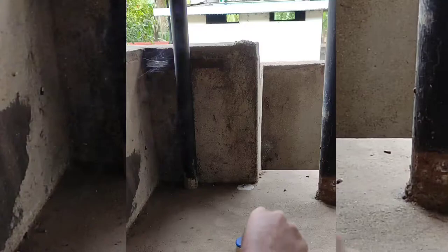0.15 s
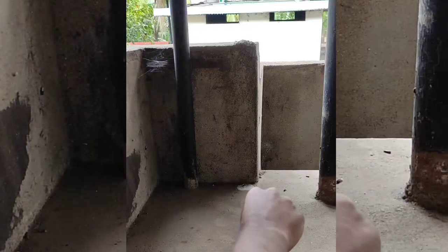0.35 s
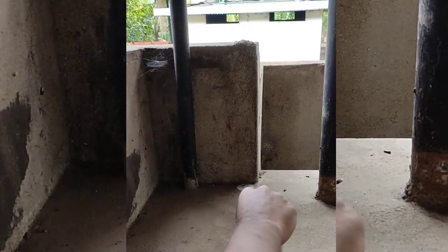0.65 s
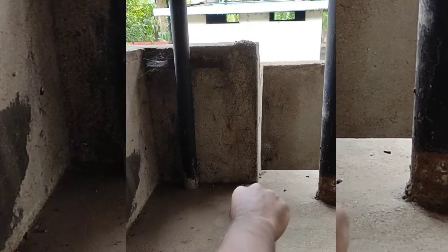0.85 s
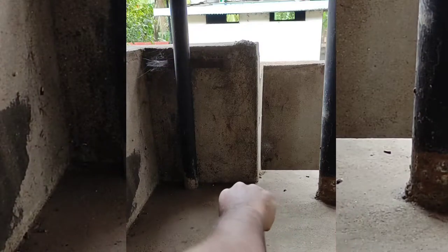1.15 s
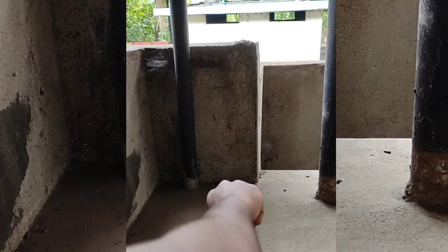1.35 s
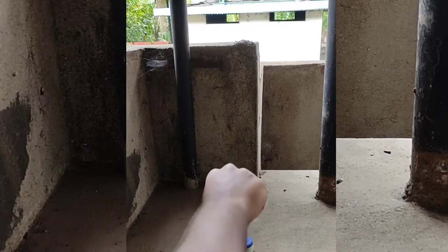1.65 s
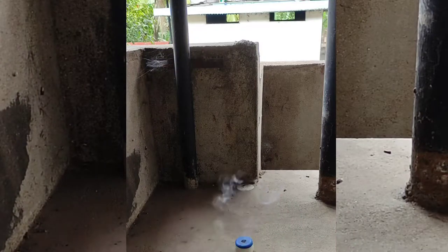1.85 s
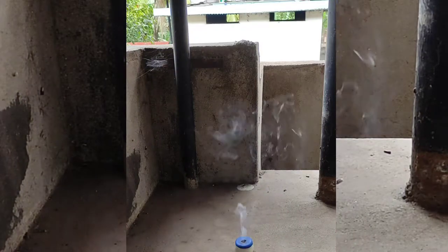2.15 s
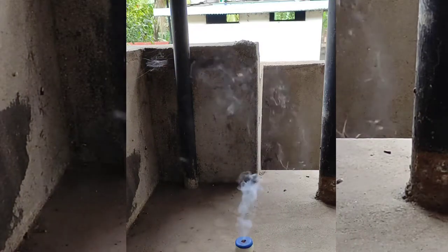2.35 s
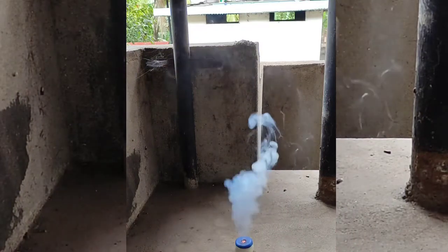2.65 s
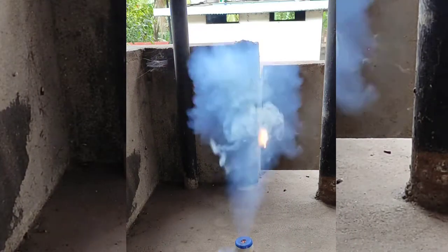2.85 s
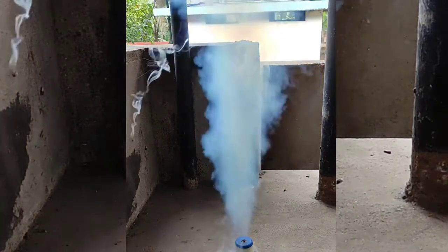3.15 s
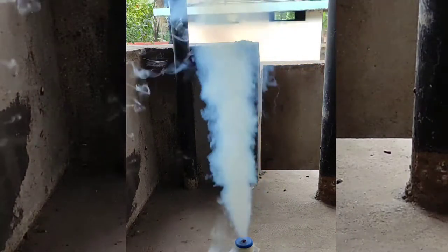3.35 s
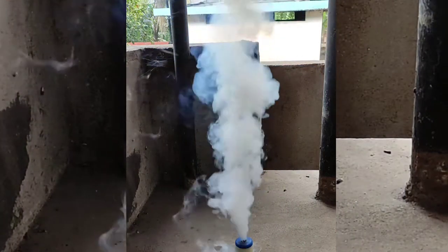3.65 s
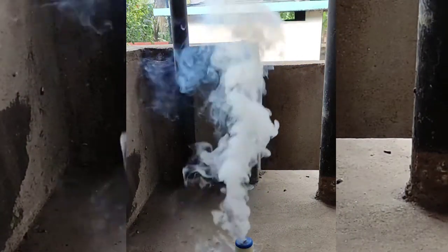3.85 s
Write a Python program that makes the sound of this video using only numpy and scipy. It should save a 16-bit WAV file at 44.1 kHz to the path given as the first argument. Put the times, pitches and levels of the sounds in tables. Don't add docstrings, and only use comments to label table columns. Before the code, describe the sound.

Short fierce hiss of gas from a bottle cap on concrete, preceded by dull puffs and tiny snaps, over a vehicle roar that nears, then fades into low exhaust drone; phone recording with hard close echoes.

```python
import sys
import numpy as np
from scipy import signal
from scipy.fft import rfft, irfft
from scipy.io import wavfile
from scipy.ndimage import uniform_filter1d, map_coordinates

SR = 44100
rng = np.random.default_rng(int(sys.argv[2]) if len(sys.argv) > 2 else 0)


def store_pcm(level_fs):
    pcm = np.round(np.clip(level_fs, -1, 1) * 32767).astype(np.int16)
    wavfile.write(sys.argv[1], SR, np.atleast_2d(pcm).T)


def to_linear_factor(level_db):
    exponent = np.asarray(level_db, float) / 20
    return 10 ** exponent


N = 176400
T = np.arange(N) / SR
HZ = np.maximum(np.fft.rfftfreq(N, 1 / SR), 1)


def curve(rows, order=1):
    rows = np.array(rows)
    return np.interp(T, rows[:, 0], rows[:, order])


def colour(rows):
    rows = np.array(rows)
    return to_linear_factor(np.interp(np.log(HZ), np.log(rows[:, 0]), rows[:, 1], left=-90))


def bumps(rows):
    return to_linear_factor(sum(db / (1 + (2 * (HZ - hz) / width) ** 2) for hz, width, db in rows))


def shaped(x, gain):
    return irfft(rfft(x) * gain, N)


def unit(x):
    return x / np.sqrt(np.mean(x ** 2))


def walk(rate):
    hold = int(SR / rate)
    steps = rng.standard_normal(600)[np.arange(N) // hold]
    return unit(uniform_filter1d(uniform_filter1d(steps, hold), hold))


def swell_at(s, length):
    return np.exp(-(2 * (T - s) / length) ** 2)


# (time [s], level [dB], tilt [dB per octave])
ROAR = [
    (.09, -35, 0.2),
    (.6, -33, 0),
    (1.1, -30.5, 0),
    (1.6, -27, 1.23),
    (2.0, -24, 0.9),
    (2.4, -23, 1.96),
    (2.7, -21, 2.5),
    (3.0, -21.5, 2.2),
    (3.5, -22, -0.3),
    (4.0, -24.5, 0.16),
]
# (frequency [Hz], density [dB per Hz])
ROAR_COLOUR = [(25, -33), (55, -27), (120, -9.5), (400, -9), (1300, -14), (2200, -21.5), (4300, -28),
               (15000, -50.5)]
# (centre [Hz], width [Hz], height over the roar [dB])
LANDING = [(71, 6.6, 7), (93, 6.3, 5), (142.2, 22.4, 7), (162.6, 19, 7), (207, 19, -0.5),
           (294.8, 35.6, 7.5), (329.7, 19, 8.5), (444.7, 12, 4.5), (497.4, 7.6, 5.5), (1057, 82, 2),
           (1276, 430, 3), (1720, 310, 3), (2000, 500, -1.5)]
PORT_GAP_HZ = 940
SWELL_DB, FLICKER_DB = 0.07, 0.2


def roar():
    mid, side = rfft(rng.standard_normal((2, N)))
    alike = np.sinc(HZ / PORT_GAP_HZ) * np.exp(-HZ / 20000.0)
    sign = np.array([1, -1])[:, None]
    both = mid * np.sqrt(1 + alike) + sign * side * np.sqrt(1 - alike)
    both = both * colour(ROAR_COLOUR) * bumps(LANDING)
    both = both / np.std(irfft(both, N))
    swell, level, tilt = walk(5.12), curve(ROAR), curve(ROAR, order=2)
    out = 0
    for octave in np.arange(-4, 5.5, .5):
        band = np.clip(1 - 2 * abs(np.log2(HZ / 500) - octave), 0, 1)
        db = level + tilt * np.clip(octave, -1, 1.6) + SWELL_DB * swell + FLICKER_DB * walk(9)
        out = out + irfft(both * band, N) * to_linear_factor(db)
    return out


# (time [s], length [s], centre [Hz], level [dB])
BOOMS = [(0.655, 0.11, 322, -31.5), (1.177, 0.29, 317, -34.5), (1.96, 0.17, 304, -31.5),
         (2.05, 0.44, 720, -33.5), (2.466, 0.44, 300, -26.5), (2.76, 0.16, 1530, -32.5),
         (2.92, 0.31, 483, -28), (3.51, 0.21, 296, -42), (1.55, 0.12, 165, -40), (1.622, .25, 1750, -46),
         (1.823, 0.44, 1053, -34.5), (2.39, 0.58, 1270, -36.5), (2.653, 0.1, 484, -29.5),
         (2.702, 0.4, 1860, -36.5), (2.418, .2, 202, -36), (2.9, .16, 238, -31), (2.875, 0.11, 165, -29.5),
         (3.054, 0.068, 500, -30.5), (3.147, 0.16, 330, -34), (3.223, 0.13, 245, -27),
         (3.427, 0.11, 450, -30.5), (3.745, 0.17, 317, -25.5), (3.92, 0.096, 142, -28.5)]
BOOM_WIDTH = 0.15


def booms():
    noise = rng.standard_normal(N)
    out = 0
    for s, length, hz, db in BOOMS:
        resonance = 1 / (1 + (2 * (HZ / hz - 1) / BOOM_WIDTH) ** 2)
        out = out + to_linear_factor(db) * unit(shaped(noise, resonance)) * swell_at(s, length)
    return out


# (time [s], level [dB])
DRONE = [
    (.09, -49),
    (2.1, -60),
    (2.5, -43),
    (2.8, -52),
    (3.0, -41),
    (3.2, -41),
    (3.5, -35.5),
    (4.0, -45),
]
DRONE_HZ, DRONE_WIDTH_HZ = 75.1, 1.96


def drone():
    phase = 2 * np.pi * np.cumsum(DRONE_HZ + DRONE_WIDTH_HZ * walk(12)) / SR
    return np.sqrt(2) * np.sin(phase) * to_linear_factor(curve(DRONE) + 5.6 * walk(8.34))


# (time [s], length [s], level [dB], left over right [dB])
PUFFS = [
    (2.199, 0.041, -41.5, -13),
    (2.266, 0.084, -44, -10),
    (2.41, 0.12, -40, -11),
    (2.513, 0.14, -49, -12),
    (2.622, 0.064, -29, -2),
    (2.695, 0.046, -41, -6),
    (2.834, 0.15, -36, -1),
]
# (frequency [Hz], density [dB per Hz])
PUFF_COLOUR = [(1000, 10.5), (2500, 4.5), (4500, -0.5), (6500, -2.5), (8500, -14.5), (12000, -10),
               (15800, -11)]


def puffs():
    gas = unit(shaped(rng.standard_normal(N), colour(PUFF_COLOUR))) * to_linear_factor(1.5 * walk(70))
    breaths = 0
    for s, length, db, pan in PUFFS:
        port_db = db + np.array([[pan], [-pan]]) / 2
        breaths = breaths + to_linear_factor(port_db) * swell_at(s, length)
    return gas * breaths


# (time [s], level [dB], pitch [Hz], decay by 60 dB [s])
SPITS = [
    (2.244, -40, 12300, .008),
    (2.2622, -28, 12400, .005),
    (2.2821, -10, 15000, .004),
    (2.2836, -14, 14100, .005),
    (2.33, -42, 11900, .008),
    (2.384, -26, 2400, .006),
    (2.468, -20, 2300, .005),
]
SPIT_PAN_DB = -22


def spits():
    out = 0
    for s, db, hz, t60 in SPITS:
        age = np.maximum(T - s, 0)
        attack = np.minimum(age / 0.00046, 1)
        out = out + to_linear_factor(db - 60 * age / t60) * np.sin(2 * np.pi * hz * age) * attack
    return out * to_linear_factor(np.array([[SPIT_PAN_DB], [0]]))


# (time [s], flow [dB])
JET = [
    (2.8, -47),
    (2.86, -23),
    (2.92, -14),
    (2.975, -16),
    (3.08, -18),
    (3.29, -20),
    (3.35, -22.5),
    (3.42, -34.5),
    (3.5, -48),
]
# (frequency [Hz], density [dB per Hz])
JET_COLOUR = [(800, -9.5), (2000, -10), (3200, -2.5), (4400, -1), (7000, -7), (9000, -3), (12000, -3.5),
              (14000, -2.5), (15800, -8)]
# (centre [Hz], width [Hz], height [dB])
NOTCHES = [(3180, 94, -15), (3750, 110, -12), (4460, 480, -2), (4980, 160, -7), (5740, 150, -6),
           (6750, 240, -5), (10000, 120, 7.5), (14400, 200, -5)]
BODY_HZ, BODY_SHARE, BODY_DB = 6500, 0.8, 1.1
FLUTTER_DB, FLUTTER_PER_S = .7, 60


def jet():
    gas = unit(shaped(rng.standard_normal(N), colour(JET_COLOUR) * bumps(NOTCHES)))
    body = shaped(gas, 1 / (1 + (HZ / BODY_HZ) ** 8))
    treble = gas - body
    shut = np.clip(abs(T - 3.15) / .35 - 1, 0, 1)
    flow = curve(JET) - 600 * shut
    flutter = FLUTTER_DB * walk(FLUTTER_PER_S)
    body_db = BODY_SHARE * (flow + 21.5) - 27.5 + BODY_DB
    return treble * to_linear_factor(flow - 8.5 + flutter) + body * to_linear_factor(body_db + flutter)


EARLY_S = 0.0047
TAIL_T60_S, TAIL_DB, TAIL_TOP_HZ = 0.16, -4, 9100
SWAY_DB, SWAY_PER_S = 5, 14


def unit_energy(echo):
    return echo / np.sqrt(np.sum(echo ** 2, axis=1, keepdims=True))


def walls(x):
    age = T[:SR // 3]
    sway = np.array([to_linear_factor(SWAY_DB * walk(SWAY_PER_S)) for _ in range(4)])
    lowpass = signal.butter(2, TAIL_TOP_HZ, fs=SR)
    out = x
    for share in sway / np.sqrt(np.sum(sway ** 2, axis=0)):
        chance = rng.standard_normal((2, 2, len(age)))
        early = chance[0] ** 3 * np.exp(-age / EARLY_S) * (age > .0008)
        tail = chance[1] * to_linear_factor(-60 * age / TAIL_T60_S) * (age > .003)
        tail = signal.lfilter(*lowpass, tail)
        echo = unit_energy(early) + to_linear_factor(TAIL_DB) * unit_energy(tail)
        out = out + signal.fftconvolve(x * share, echo, axes=1)[:, :N]
    return out


SPIT_WET = .12


def scene():
    grains = spits()
    outside = roar() + drone() + booms()
    landing = walls(jet() + puffs() + SPIT_WET * grains)
    return outside + landing + (1 - SPIT_WET) * grains


# (from [s], to [s], low [Hz], high [Hz])
HOLES = [(2.87, 2.9, 7500, 7900), (2.86, 2.96, 6950, 7150), (2.86, 2.91, 4880, 5000),
         (2.95, 3.03, 3650, 3780), (2.97, 3.06, 5350, 5480), (3.0, 3.1, 9600, 9720),
         (3.01, 3.07, 3080, 3200), (3.02, 3.04, 15500, 16500), (3.05, 3.11, 5500, 5760),
         (3.22, 3.25, 6950, 7200), (3.36, 3.39, 3080, 3200), (2.0, 2.09, 7000, 7250),
         (2.32, 2.345, 7400, 7800), (2.53, 2.58, 7150, 7500), (2.71, 2.76, 12500, 13000)]
# (from [s], to [s], low [Hz], high [Hz])
SIDE_HOLES = [(2.83, 3.43, 9750, 10300), (2.87, 2.97, 13900, 14500), (2.93, 2.965, 9000, 9750),
              (3.025, 3.08, 9000, 9750), (2.98, 3.3, 3050, 3170), (2.93, 3.27, 3400, 3500),
              (3.02, 3.13, 6950, 7150), (3.4, 3.47, 6950, 7250), (3.0, 3.035, 15100, 16500)]
PATCH_FROM_HZ, PATCH_HZ, PATCH_S, PATCH_DB = 2500, 105, .065, 2.9
HOLE_AT, HOLE_DB = 1.75, 36
STARVED_HZ, STARVED_WIDTH_HZ, STARVED_BY = 6300, 2000, .45
EDGE_HZ, EDGE_STEP_HZ = 15550, 300


def patchy(x):
    hz, s, cells = signal.stft(x, SR, nperseg=1024)
    coarse = rng.standard_normal((400, 200))
    grid = np.meshgrid(hz / PATCH_HZ, s / PATCH_S, indexing="ij")
    field = 1.4 * map_coordinates(coarse, grid, order=1)
    hz = hz[:, None]
    starved = np.exp(-((hz - STARVED_HZ) / STARVED_WIDTH_HZ) ** 2) + np.clip(hz / 2000 - 6.5, 0, 1)
    sill = HOLE_AT - STARVED_BY * starved
    db = PATCH_DB * field - HOLE_DB * np.clip(4 * (-field - sill), 0, 1)
    quiet = np.interp(s, T, curve(JET)) < -30
    ragged = EDGE_HZ + EDGE_STEP_HZ * np.round(coarse[-1, (s / .046).astype(int)])
    edge = np.where(quiet, ragged, SR)
    gain = to_linear_factor(db * np.clip(hz / PATCH_FROM_HZ - .5, 0, 1)) * (hz < edge)

    def kept(rows):
        inside = sum((s > a - .006) * (s < b + .018) * (hz > lo) * (hz < hi) for a, b, lo, hi in rows)
        return to_linear_factor(-HOLE_DB * inside)

    mid = (cells[0] + cells[1]) / 2
    side = (cells[0] - cells[1]) / 2 * kept(SIDE_HOLES)
    cells = np.array([mid + side, mid - side]) * kept(HOLES)
    return signal.istft(cells * gain, SR, nperseg=1024)[1][:, :N]


def top_cut(x):
    return signal.sosfilt(signal.butter(12, 15980, fs=SR, output="sos"), x)


# (centre [Hz], width [Hz], height [dB])
PORTS = [
    [(8920, 2300, 11), (7380, 500, -9), (11200, 720, -9.5), (5450, 1400, -1.5)],
    [(11670, 4800, 11), (8170, 1520, -11), (13100, 970, -1), (5350, 1500, -4)],
]
RIGHT_DB = .6
TOP_HZ, TOP_SLOPE_HZ, TOP_DB = 15780, 300, -8
CEILING = 1.3
START_S = .0818


def record(dry):
    slope = np.clip(1 - (TOP_HZ - HZ) / TOP_SLOPE_HZ, 0, 1)
    cut = (HZ < TOP_HZ) * to_linear_factor(TOP_DB * slope)
    left = shaped(dry[0], cut * bumps(PORTS[0]))
    right = to_linear_factor(RIGHT_DB) * shaped(dry[1], cut * bumps(PORTS[1]))
    rounded = CEILING * np.tanh(np.array([left, right]) / CEILING)
    fade_in = np.clip((T - START_S) / 0.00041, 0, 1)
    return top_cut(patchy(rounded) * fade_in)


dry = scene()
out = record(dry)
store_pcm(out)
```